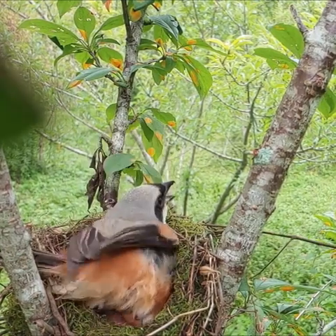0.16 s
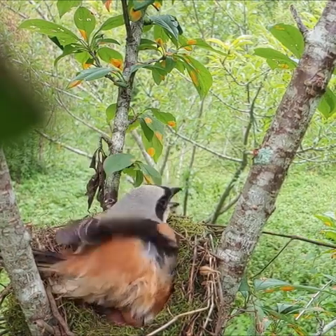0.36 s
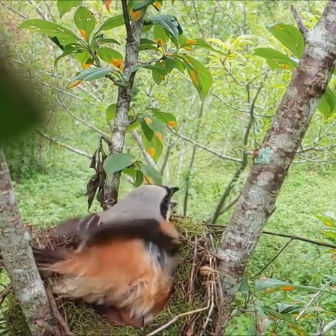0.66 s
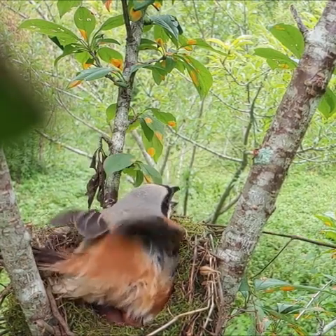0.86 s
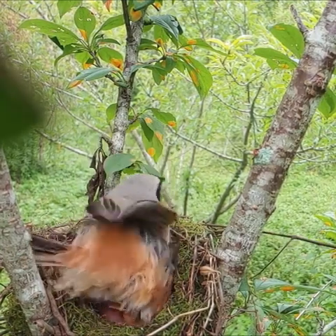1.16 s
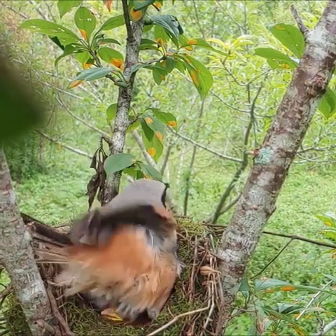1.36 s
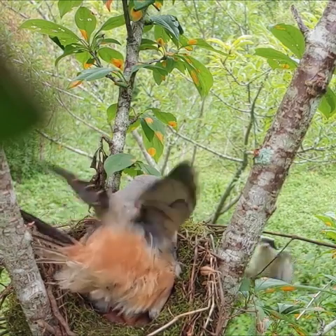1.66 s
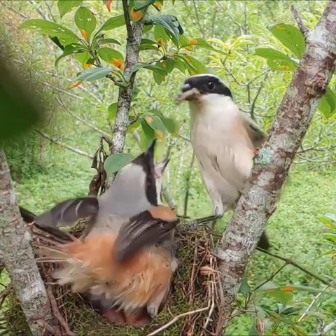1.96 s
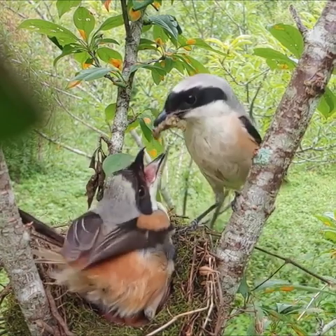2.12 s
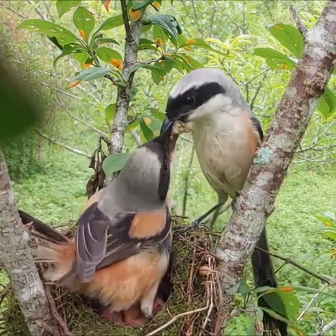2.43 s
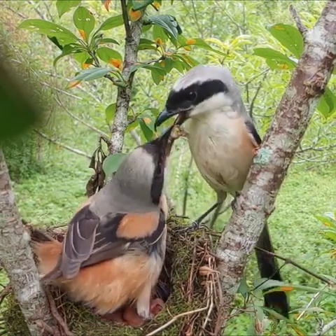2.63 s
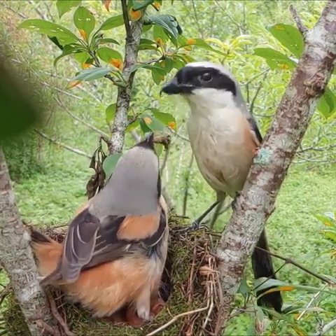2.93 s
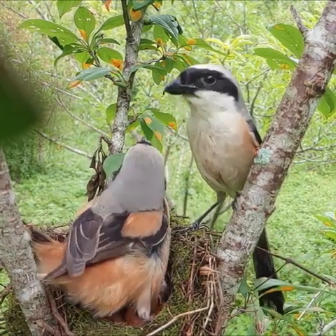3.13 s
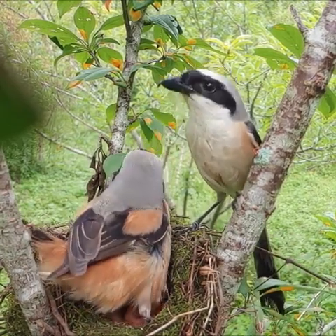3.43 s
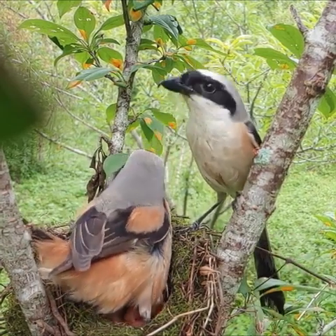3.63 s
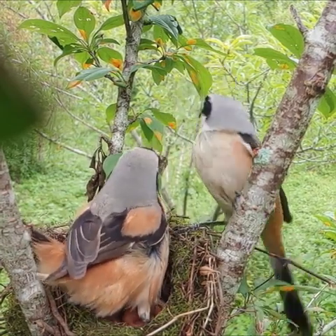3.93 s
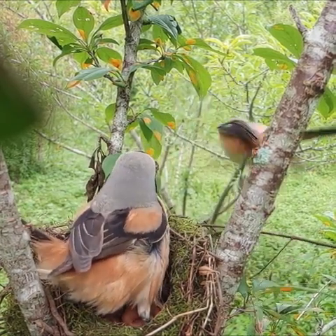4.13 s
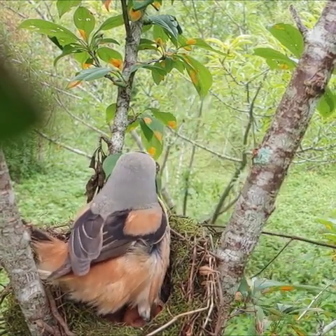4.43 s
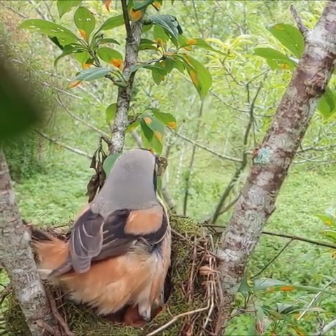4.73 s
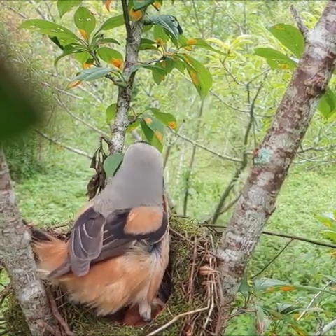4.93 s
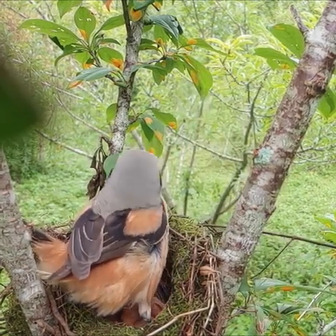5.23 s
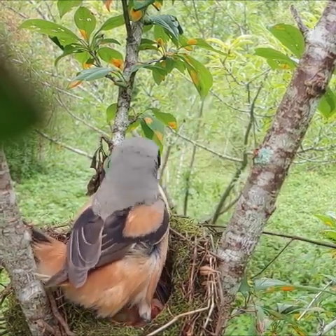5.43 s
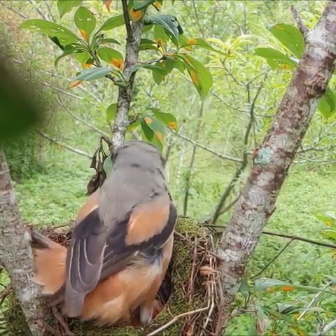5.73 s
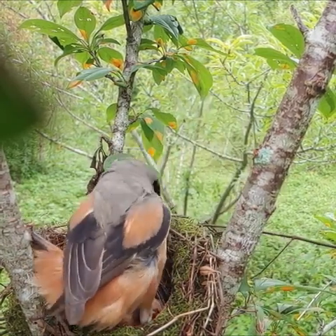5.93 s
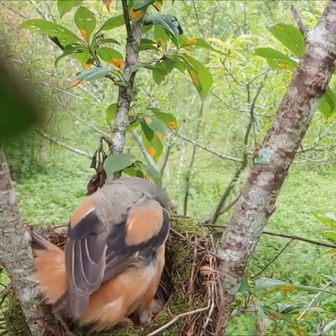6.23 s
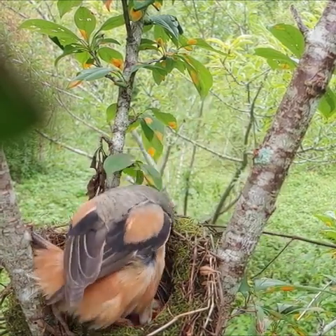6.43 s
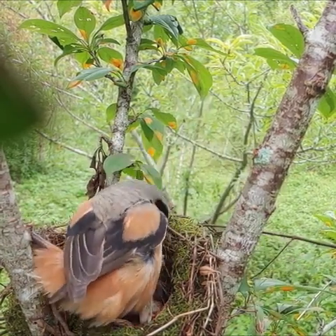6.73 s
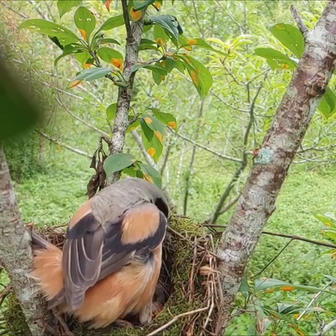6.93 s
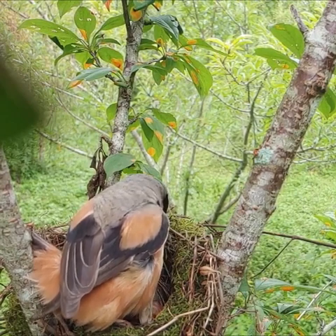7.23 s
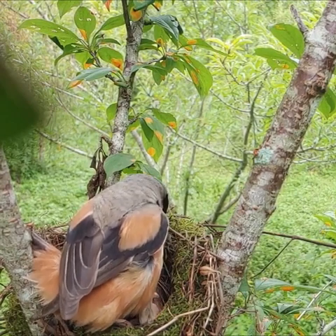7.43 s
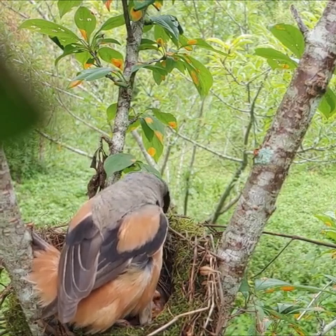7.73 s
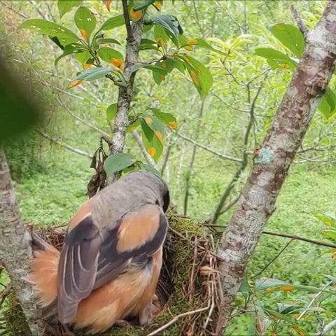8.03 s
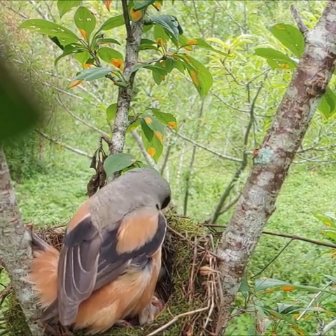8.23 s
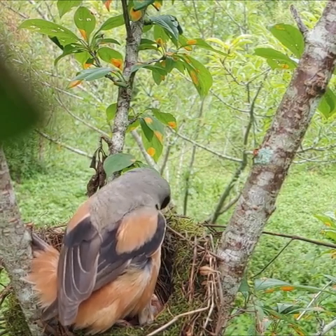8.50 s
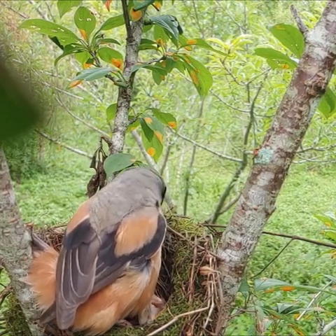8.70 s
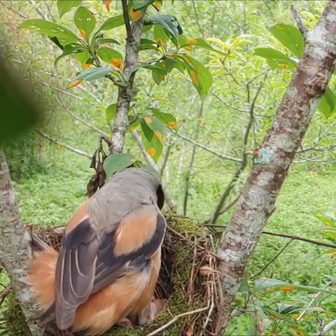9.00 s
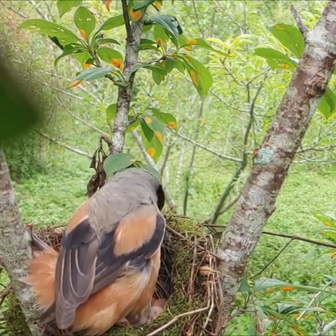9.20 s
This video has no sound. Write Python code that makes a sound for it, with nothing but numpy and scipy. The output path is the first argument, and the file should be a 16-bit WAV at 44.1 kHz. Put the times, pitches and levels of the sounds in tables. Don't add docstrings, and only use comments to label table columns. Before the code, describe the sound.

Hoarse, buzzy begging cries turn muffled and gulping during a feeding, wings flutter in and away, then cicadas and faint distant birds remain.

```python
import sys
import numpy as np
from scipy import signal
from scipy.fft import rfft, irfft, next_fast_len
from scipy.io import wavfile
from scipy.ndimage import uniform_filter1d, map_coordinates

SR = 44100
rng = np.random.default_rng(int(sys.argv[2]) if len(sys.argv) > 2 else 0)


def linear_from_db(decibels):
    return 10 ** (np.asarray(decibels, float) / 20)


def wav_record(signal):
    frames = np.transpose(np.atleast_2d(signal))
    bounded = np.clip(frames, -1, 1)
    quanta = np.round(bounded * 32767).astype(np.int16)
    wavfile.write(sys.argv[1], SR, quanta)


N = 412776

# frequency in Hz, level in dB per Hz.
WOOD_SPECTRUM = [(13, -42), (22, -2), (54, 1), (151, -2.5), (246, -4), (282, -2), (499, -9.5), (550, -5),
                 (632, -9), (1900, -17), (2400, -16.5), (3120, -66), (5280, -120)]
# frequency in Hz, left-right likeness from 0 to 1.
LIKENESS = [(60, 0.047), (180, 0.22), (540, 0.13), (1610, 0.065), (4820, 0.0096), (14400, 0.05)]

# frequency in Hz, level in dB.
TYMBAL_RESONANCE = [(2200, -40), (2400, -14), (2650, -4), (2900, 0), (3200, 0), (3500, -1), (4000, -3),
                    (4400, -30)]
# time in seconds, clicks a second, level in dB.
NEAR_CICADA_COURSE = [(0, 265, -48), (2.8, 266, -45), (7.2, 263.5, -48), (8.1, 262.5, -45.5),
                      (9.36, 257.7, -43)]
# frequency in Hz, level in dB per Hz.
PULSING_SPECTRUM = [(3000, -68), (3500, -15), (3950, -0.5), (4350, -5.5), (4480, -3.5), (4560, -54)]
# frequency in Hz, level in dB per Hz.
LOW_CHORUS_SPECTRUM = [(1900, -65.5), (2250, -24), (2480, -14.5), (2650, -6.5), (3100, -5), (3600, -2),
                       (4200, -10.5), (4470, -22), (4560, -51)]
HIGH_CHORUS_SPECTRUM = [(4300, -48), (4700, -8.5), (5100, -7), (5700, -9), (6150, 1), (6750, 3.5),
                        (7000, -9.5), (7800, -10), (9000, -17.5), (11600, -29), (12200, -32), (14500, -62),
                        (15500, -120)]
# time in seconds, low chorus in dB, high chorus in dB.
CHORUS_COURSE = [(0, -43.5, -41), (2.8, -60, -46.5), (3.7, -52, -47.5), (7.2, -44.5, -48.5),
                 (9.36, -42, -47.5)]

# time in seconds, pitch in Hz, effort in dB,
# gape from 0 to 1, head turned to the listener from 0 to 1.
FIRST_CALL = [(0, 855.5, -38.5, 0.71, 0.55), (.19, 862, -37, 0.69, 0.51), (.27, 903, -36.5, 0.83, 0.49)]
LONG_CALL = [(0.389, 760, -43.5, 0.62, 0.48), (0.542, 735, -42.5, 0.81, 0.49),
             (1.14, 750, -40.5, 0.8, 0.52), (1.25, 750, -39.5, 0.81, 0.54), (1.3, 812, -39.5, 0.88, 0.5),
             (1.43, 722, -39.5, .8, 0.55), (1.464, 803, -37, 0.73, 0.67), (1.57, 860, -38.5, 0.77, 0.89)]
MEETING_CALL = [(1.665, 640, -44.5, 0.63, 0.6), (1.765, 677, -40.5, 0.74, 0.54),
                (1.86, 765.5, -40.5, 0.86, 0.61), (2.081, 793, -38.5, 0.85, 0.58),
                (2.212, 832, -33.5, 0.79, 0.72), (2.378, 859.6, -36, 0.95, 0.78),
                (2.453, 865.6, -34, 0.78, 0.83), (2.613, 815.4, -35.5, 0.65, 0.87),
                (2.753, 926.3, -30, 0.51, 1)]
MOUTHFUL_CALL = [(2.865, 630, -40, 0.32, 0.78), (2.98, 670.5, -35, .3, 0.83),
                 (3.15, 763.5, -34, 0.35, 0.79), (3.221, 896, -31.5, 0.44, 0.76)]
SWALLOWING_CALL = [(3.329, 680, -43.5, 0.33, 0.52), (3.392, 671, -39.5, 0.37, 0.7),
                   (3.548, 813, -37, 0.45, 0.66), (3.625, 826, -34, 0.46, 0.47)]
LAST_CALL = [(3.82, 1153, -39.5, 0.031, .3), (3.856, 1185, -33.5, 0.047, 0.38),
             (3.867, 638.5, -42.5, 0.25, .47), (3.99, 724, -36, 0.29, 0.28), (4.049, 635, -33, 0.24, 0.24),
             (4.09, 730, -34.5, .28, 0.67), (4.15, 720, -29.5, 0.234, 0.33)]
BEGGING_CALLS = [FIRST_CALL, LONG_CALL, MEETING_CALL, MOUTHFUL_CALL, SWALLOWING_CALL, LAST_CALL]
# throat resonance at the start in Hz, at the end in Hz,
# beak resonance in Hz, fundamental in dB, gulping from 0 to 1.
CALL_POSTURE = [
    (3050, 3250, 5500, 2, 0),
    (3080, 3280, 5980, 4, 0),
    (3300, 2900, 5650, 2, 0),
    (3300, 3400, 4900, 3, .95),
    (3400, 3400, 4800, 3, .5),
    (3650, 3700, 5600, 1, .5),
]
# start in seconds, end in seconds, offset above the pitch in Hz,
# offset at the end in Hz, level against the main voice in dB.
SECOND_SYRINX = [(0, 0.281, 430, 430, -9), (0.553, 1.453, 200, 602.6, -8), (1.82, 2.33, 390, 561, -9),
                 (2.867, 3.129, 300, 450, -9), (3.359, 3.578, 330, 450, -11.5),
                 (3.918, 3.994, 412, 476, 2.5), (4.063, 4.147, 403.6, 408, -8)]
# start in seconds, end in seconds, unevenness from 0 to 1.
STEADY_SPELLS = [(0, .24, .34), (.24, .3, .28), (1.47, 1.59, .18), (2.34, 2.43, .04), (2.43, 2.5, .15),
                 (2.5, 2.74, .04), (3.13, 3.25, .4), (3.57, 3.66, .15), (3.78, 3.86, .06),
                 (3.92, 3.995, .25), (4.01, 4.045, .25), (4.065, 4.19, .38)]
CATCH_TIMES = [2.43, 2.985, 3.998, 4.05, 4.095, 4.142]
# frequency in Hz, left minus right in dB.
CALLER_LEAN = [(60, 2), (180, 9), (540, 6), (1610, 2), (4820, -2), (14400, -4.5)]

# nearest beat in dB, beats until twice as far, push in Hz.
ARRIVING = (-34.5, 3.7, 48)
DEPARTING = (-36.5, 3.4, 87)
# time in seconds, peak in dB, push in Hz.
PERCH_FLAPS = [(2.04, -42, 30.24), (2.119, -57, 88.1), (4.179, -45.5, 37), (4.338, -40, 48.7),
               (4.389, -41, 76)]
# frequency in Hz, level in dB per Hz.
EDDY_SPECTRUM = [(12, -28), (25, -24), (40, -1), (100, 0), (200, -11.5), (400, -15), (900, -23.5),
                 (1600, -31), (3000, -100)]
# time in seconds, peak in dB, frequency in Hz, 60 dB decay in seconds,
# share of crack.
KNOCKS = [(2.085, -34, 650, 0.01, 0.29), (2.117, -41.5, 232, 0.026, 0.14), (2.986, -39, 1070, 0.0061, 0.38),
          (5.055, -52, 531.6, 0.03, 0), (6.386, -53, 920, .04, 0), (6.387, -54, 1820, .035, 0)]

# time in seconds, level in dB, number of notes.
FAR_TRILLS = [(2.895, -52, 7), (8.02, -52, 7)]
# start in Hz, end in Hz, length in seconds.
RISING_SWEEP = (6950, 7700, .024)
FALLING_SWEEP = (5350, 4600, 0.039)
# time in seconds, pitch factor, level in dB.
FAR_CHIRPS = [(5.295, 0.65, -50), (6.447, 0.98, -48), (6.79, 1, -49), (7.063, 0.95, -50), (7.206, 1, -49),
              (7.34, 0.95, -51)]
# start of the fall in seconds, seconds held before it, level in dB.
FAR_WHISTLES = [(7.592, .042, -37), (8.06, .01, -49), (9.116, 0.079, -39)]


def unit(x):
    return x / np.sqrt(np.mean(x ** 2) + 1e-20)


def along(points, hz):
    f, v = np.transpose(points)
    return np.interp(np.log(hz + 1), np.log(f + 1), v)


def curves(rows, t=None):
    s, *columns = np.transpose(rows)
    t = np.arange(N) / SR if t is None else t
    return [np.interp(t, s, column) for column in columns]


def wobble(rate):
    knots = rng.standard_normal(int(N * rate / SR) + 4)
    return map_coordinates(knots, [np.arange(N) * rate / SR])


def filtered(x, response):
    m = next_fast_len(N + SR // 2)
    return irfft(rfft(x, m) * response(np.fft.rfftfreq(m, 1 / SR)), m)[..., :N]


def rush(spectrum, patchy_db):
    z = signal.stft(rng.standard_normal((2, N)), nperseg=512)[2]
    field = uniform_filter1d(rng.standard_normal(z.shape[1:]), size=5, axis=0)
    field = uniform_filter1d(field, size=10, axis=1)
    pair = signal.istft(z * linear_from_db(patchy_db * unit(field)), nperseg=512)[1][:, :N]

    def shaped(hz):
        angle = np.arccos(np.clip(along(LIKENESS, hz), -1, 1)) / 2
        return linear_from_db(along(spectrum, hz)) * [np.cos(angle), np.sin(angle)]

    mid, side = filtered(pair, shaped)
    return unit(np.array([mid + side, mid - side]))


def echoes(x, t60):
    t = np.arange(SR // 3) / SR
    tail = rng.standard_normal((2, len(t))) * linear_from_db(-60 * t / t60) * (t > .003)
    return signal.fftconvolve(x[None], tail / np.linalg.norm(tail[0]), axes=1)[:, :N]


def wood():
    return linear_from_db(-55) * rush(WOOD_SPECTRUM, patchy_db=-0.5)


def near_cicada():
    clicks_hz, db = curves(NEAR_CICADA_COURSE)
    turn = 2 * np.pi * np.cumsum(clicks_hz * (1 + .0008 * wobble(3) + .007 * wobble(40))) / SR
    comb = np.zeros((2, N))
    for k in range(9, 17):
        line_gain = linear_from_db(3 * np.array([wobble(7), wobble(7)]))
        comb += line_gain * np.cos(k * turn + rng.uniform(0, 2 * np.pi, (2, 1)))
    return linear_from_db(db) * unit(filtered(comb, lambda hz: linear_from_db(along(TYMBAL_RESONANCE, hz))))


def pulsing_cicada():
    cycle = 2 * np.pi * np.cumsum(16.2 * (1 + 0.0426 * wobble(2.4))) / SR
    pulses = unit(linear_from_db(2.3 * np.sin(cycle) + 2.4 * np.sin(3 * cycle) + 0.93 * wobble(5.1)))
    db = -40 - 3 * np.arange(N) / N
    return linear_from_db(db) * pulses * rush(PULSING_SPECTRUM, patchy_db=-0.5)


def cicadas():
    low_db, high_db = curves(CHORUS_COURSE)
    low_gain = linear_from_db(low_db + 1.5 * wobble(5.9) + 2.1 * wobble(200))
    high_gain = linear_from_db(high_db + 1.44 * wobble(8) + 0.18 * wobble(150))
    low = low_gain * rush(LOW_CHORUS_SPECTRUM, patchy_db=3)
    high = high_gain * rush(HIGH_CHORUS_SPECTRUM, patchy_db=2.5)
    return near_cicada() + pulsing_cicada() + low + high


def gate(tables, edge):
    t = np.arange(N) / SR
    return sum(np.clip(np.minimum(t - rows[0][0], rows[-1][0] - t) / edge, 0, 1) for rows in tables)


def spells(rows, edge):
    t, (start, end) = np.arange(N) / SR, np.transpose(rows)[:2, :, None]
    way = np.clip((t - start) / (end - start), 0, 1)
    return way, np.clip(np.minimum(t - start, end - t) / edge + .5, 0, 1)


def framed(call, posture):
    (s, hz, db, gape, head), (end, end_hz, end_db, end_gape, end_head) = call[0], call[-1]
    onset = (s - .03, hz * 1.22, db + 5.5, gape, head)
    drop = 1 - .5 * (1 - end_gape)
    release = (end + .03, end_hz * drop, end_db - 6.5, end_gape, end_head - 0.67)
    rows = []
    for row in [onset, *call, release]:
        throat_hz = np.interp(row[0], (s, end), posture[:2])
        rows.append((*row, throat_hz, *posture[2:]))
    return rows


def unevenness(calls):
    t, gape = np.arange(N) / SR, curves(sum(calls, []))[2]
    onsets = [call[0][0] for call in calls[1:]]
    rasp = sum((t >= s) * np.exp(-abs(t - s) / .1) for s in onsets)
    steady = spells(STEADY_SPELLS, .015)[1]
    hoarse = .8 - .44 * gape + .2 * rasp
    return hoarse * (1 - steady.sum(0)) + np.transpose(STEADY_SPELLS)[2] @ steady


def syrinx(hz, rough, first_db):
    way, present = spells(SECOND_SYRINX, .06)
    from_hz, to_hz, second_db = np.transpose(SECOND_SYRINX)[2:, :, None]
    offset_hz = ((from_hz + (to_hz - from_hz) * way) * (present > 0)).sum(0)
    second = (linear_from_db(second_db) * present).sum(0)
    tremor = (.005 + .12 * np.clip(rough - .5, 0, 1)) * wobble(30)
    tremor += .013 * wobble(130) + (.003 + .036 * rough) * wobble(330)
    turn = 2 * np.pi * np.cumsum(hz * (1 + tremor)) / SR
    beat = 2 * np.pi * np.cumsum(offset_hz * (1 + 0.039 * wobble(30))) / SR
    buzz = np.zeros(N)
    for k in range(1, 17):
        gain = linear_from_db((k > 1) * (1.44 * wobble(60) + 2.5 * wobble(12)))
        buzz += gain * (np.cos(k * turn + k * k) + second * np.cos(k * turn + beat))
    buzz += (linear_from_db(first_db) - 1) * np.cos(turn + 1)
    buzz *= np.sqrt(hz / SR * 2) * linear_from_db(rough * wobble(200))
    breath = rng.standard_normal(N) * (1 + 1.17 * np.cos(turn)) * linear_from_db(wobble(120))
    return buzz, breath


def vocal_tract(f, gape, head, throat_hz, beak_hz):
    chest_db = 21 - 40 * gape
    beak_db, air_db = -19.5 + 29 * head, -31.5 + 19.5 * head

    def hump(hz, width_hz, order=4):
        return 1 / (1 + ((f - hz) / width_hz) ** order) / np.sqrt(width_hz / SR * 3.09)

    throat = 0.5 * hump(throat_hz + 100, 890) + .75 * hump(throat_hz - 50, 250)
    chest_width_hz = np.clip(728 - 35 * chest_db, 200, 950)
    chest = hump(1553, chest_width_hz, order=2) + 0.24 * hump(633, 270)
    beak = hump(beak_hz + 150, 1380, order=8) + 0.39 * hump(beak_hz, 390)
    air = hump(9120, 1100) + linear_from_db(-26.0) * hump(12400, 1400)
    tract = throat + linear_from_db(chest_db) * chest + linear_from_db(beak_db) * beak + linear_from_db(air_db) * air
    return linear_from_db(-chest_db) * tract / (1 + (480 / f) ** 8)


def beggar():
    calls = [framed(call, posture) for call, posture in zip(BEGGING_CALLS, CALL_POSTURE)]
    rows, rough = sum(calls, []), unevenness(calls)
    hz, *_, first_db, _ = curves(rows)
    buzz, breath = syrinx(hz, rough, first_db - 15 * rough)
    f, t, (tone, hiss) = signal.stft([buzz, breath], SR, nperseg=256)
    f = f[:, None] + 1
    uneven = abs(np.interp(t * SR, np.arange(N), rough))
    breathy_above_hz = 1900 - 4000 * np.clip(uneven - .5, 0, .3)
    share = .9 * uneven ** 1.6 / (1 + (breathy_above_hz / f) ** 2)
    share = np.maximum(share, .55 / (1 + (8800 / f) ** 20))
    _, effort_db, gape, head, throat_hz, beak_hz, _, gulping = curves(rows, t)
    gulp = gulping * (((t - 3.025) / .093 % 1) ** 2 - .3)
    tract = vocal_tract(f, gape, head, throat_hz, beak_hz + 1310 * gulp)
    z = (np.sqrt(1 - share) * tone + np.sqrt(share) * hiss) * tract * linear_from_db(effort_db)
    z = z * (1 - .8 * sum(np.exp(-((t - s) / .006) ** 2) for s in CATCH_TIMES))
    return signal.istft(z, SR, nperseg=256)[1][:N] * gate(calls, 0.015)


def wingbeats(flight, nearest_s, period_s, counts, bend):
    db, reach, hz = flight
    beats = []
    for k in counts:
        beat_db = db - 20 * np.log10(1 + abs(k / reach) ** bend) + rng.normal()
        beats.append((nearest_s + k * period_s, beat_db, hz * linear_from_db(1.6 * rng.normal())))
    return beats


def wings():
    push, puff, t = np.zeros(N + SR), np.zeros(N + SR), np.arange(SR // 8) / SR
    beats = wingbeats(ARRIVING, 1.999, .0588, range(0, -10, -1), bend=3)
    beats += wingbeats(DEPARTING, 4.46, .0644, range(19), bend=1.2)
    for s, db, hz in beats + PERCH_FLAPS:
        start, rise = round(s * SR), 1 - np.exp(-t / 0.0021)
        push[start:][:len(t)] -= linear_from_db(db + 7 - 60 * t / 0.11) * np.sin(2 * np.pi * hz * t) * rise
        puff[start:][:len(t)] += linear_from_db(db - 3) * np.exp(-((t - .024) / 0.019) ** 2)
    eddies = unit(filtered(rng.standard_normal(N), lambda hz: linear_from_db(along(EDDY_SPECTRUM, hz))))
    return push[:N] + puff[:N] * eddies


def taps():
    out, t = np.zeros(N + SR), np.arange(SR // 20) / SR
    for s, db, hz, t60, crack in KNOCKS:
        knock = np.sin(2 * np.pi * hz * t) + crack * rng.standard_normal(len(t))
        out[round(s * SR):][:len(t)] += linear_from_db(db + 7.5 - 60 * t / t60) * knock
    return filtered(out[:N], lambda hz: 1 / (1 + (hz / 3500) ** 4))


def far_chirps():
    out, notes = np.zeros(N), []
    for s, db, count in FAR_TRILLS:
        for k in range(round(count)):
            note_s = s + k * .112 + 0.0068 * rng.normal()
            notes.append((note_s, *RISING_SWEEP, db + 1.9 * rng.normal()))
    start_hz, end_hz, length = FALLING_SWEEP
    for s, pitch, db in FAR_CHIRPS:
        notes.append((s, start_hz * pitch, end_hz * pitch, length / pitch ** 2, db))
    for s, start_hz, end_hz, length, db in notes:
        u = np.arange(round(length * SR)) / (length * SR)
        sweep = np.sin(np.pi * length * u * (2 * start_hz + (end_hz - start_hz) * u))
        out[round(s * SR):][:len(u)] += linear_from_db(db + 5.0) * np.sin(np.pi * u) * sweep
    return out


def far_whistles():
    out = np.zeros(N)
    high_hz, low_hz, fall_s, tail_s = 3840, 2194, .03, 0.107
    for s, held, db in FAR_WHISTLES:
        t = np.arange(-held, tail_s, 1 / SR)
        hz = low_hz + (high_hz - low_hz) / np.cosh(np.maximum(t, 0) / fall_s * 1.4)
        hz -= 2000 * np.maximum(-t, 0)
        edge = np.clip(np.minimum(t + held, tail_s - t) / 0.0079, 0, 1)
        level = np.sqrt(2) * linear_from_db(db - 191 * np.maximum(t, -t / 2))
        out[round((s - held) * SR):][:len(t)] += level * edge * np.sin(2 * np.pi * np.cumsum(hz) / SR)
    return out * linear_from_db(2.6 * wobble(60))


def scene():
    background = wood() + cicadas()
    voice = beggar()
    direct = filtered(voice, lambda hz: linear_from_db(along(CALLER_LEAN, hz) / 2 * [[1], [-1]]))
    bright_echo = filtered(linear_from_db(-7.5) * echoes(voice, 0.025), lambda hz: 1 / (1 + (2300 / (hz + 1)) ** 4))
    trunks = linear_from_db(-12.5) * echoes(voice, 0.022)
    near = direct + bright_echo + trunks + wings() + taps()
    birds = far_chirps() + far_whistles()
    far = birds * linear_from_db([[-1.5], [1.5]]) + linear_from_db(-6) * echoes(birds, .1)
    return background + near + far


def low_pass(x):
    return signal.sosfilt(signal.butter(12, 15040, fs=SR, output="sos"), x)


def record(dry):
    return low_pass(dry)


dry = scene()
out = record(dry)
wav_record(out)
```